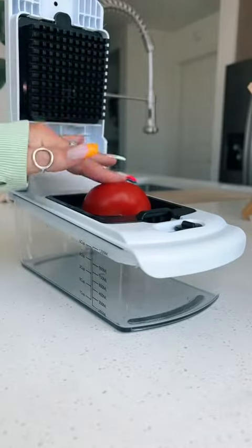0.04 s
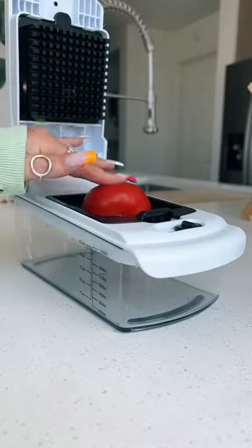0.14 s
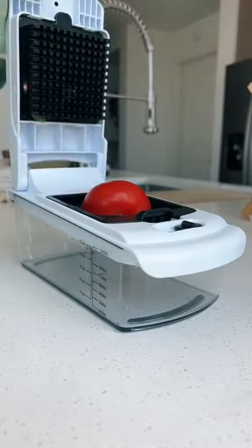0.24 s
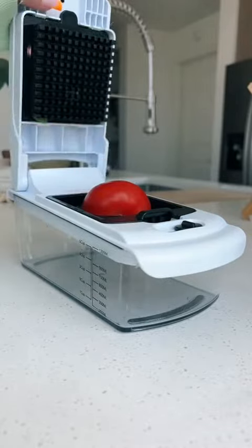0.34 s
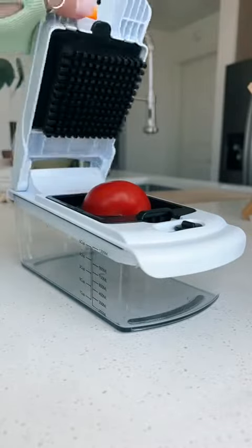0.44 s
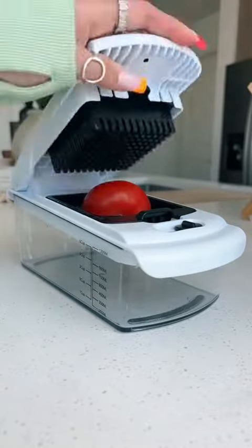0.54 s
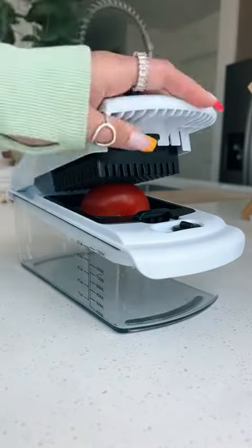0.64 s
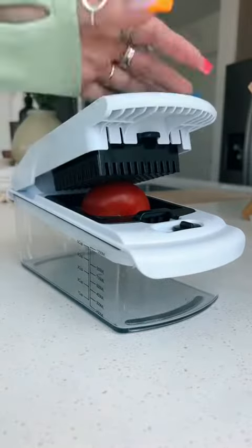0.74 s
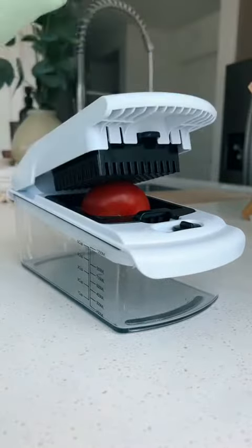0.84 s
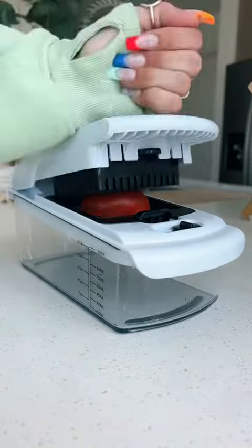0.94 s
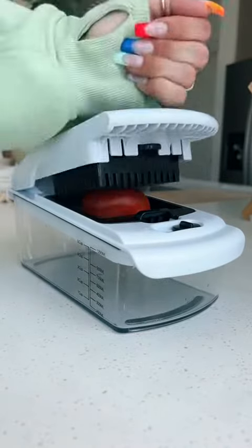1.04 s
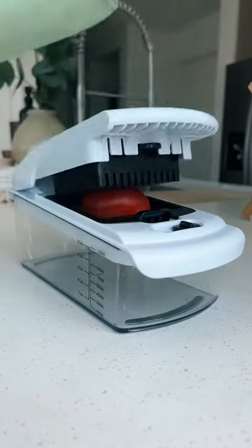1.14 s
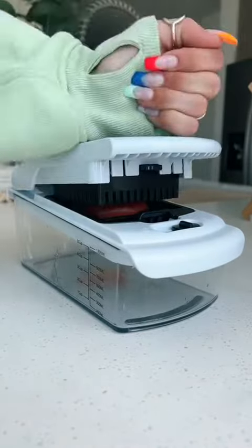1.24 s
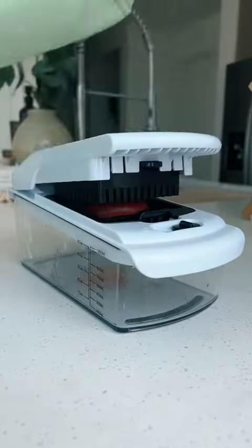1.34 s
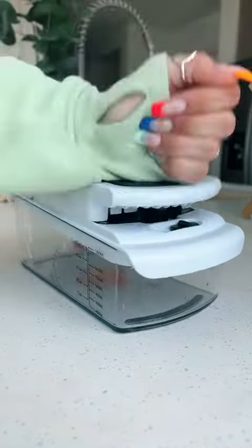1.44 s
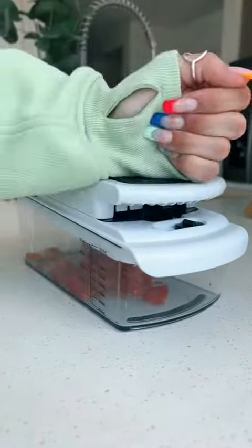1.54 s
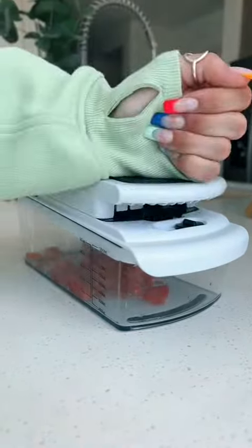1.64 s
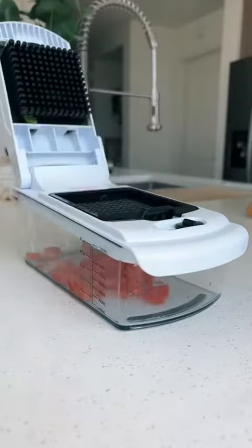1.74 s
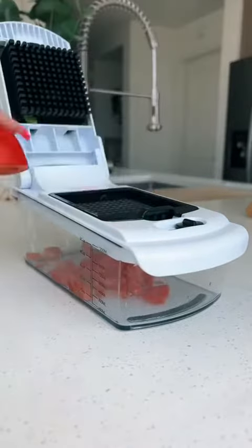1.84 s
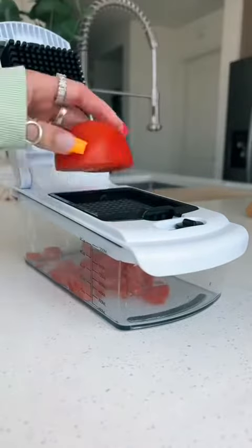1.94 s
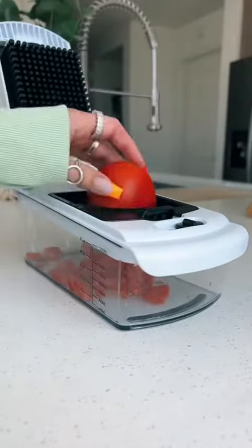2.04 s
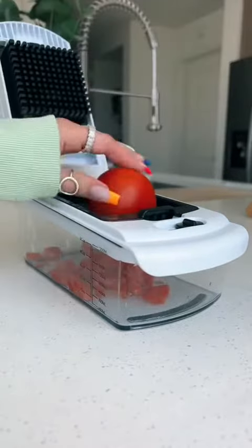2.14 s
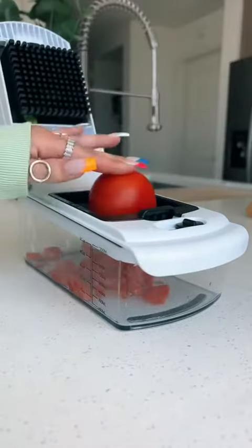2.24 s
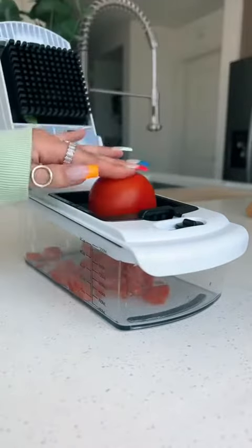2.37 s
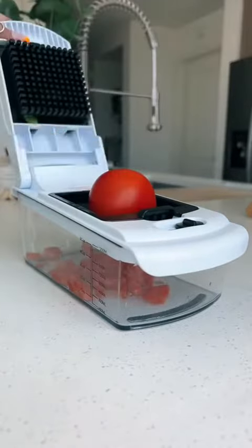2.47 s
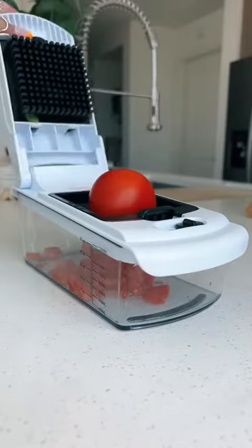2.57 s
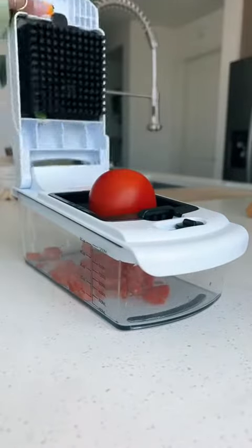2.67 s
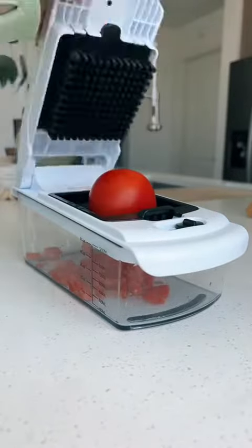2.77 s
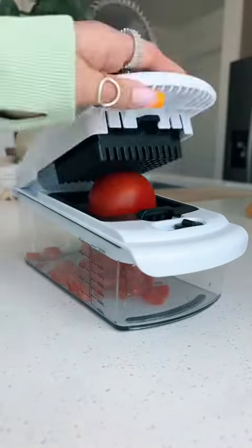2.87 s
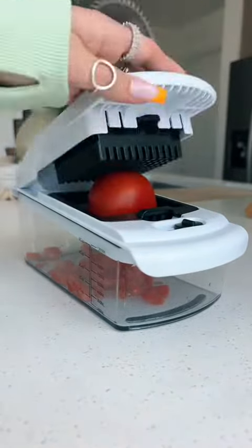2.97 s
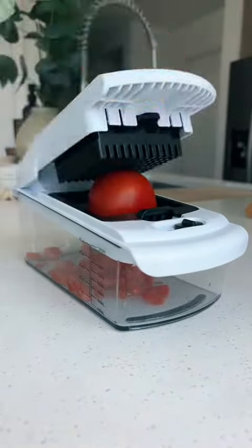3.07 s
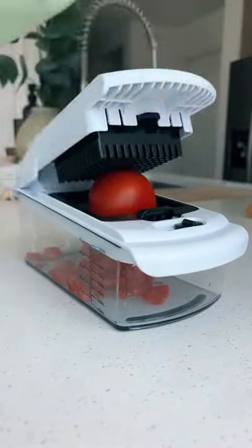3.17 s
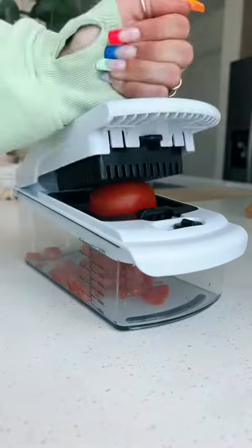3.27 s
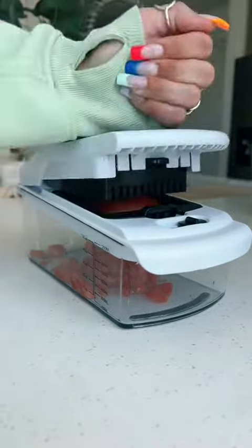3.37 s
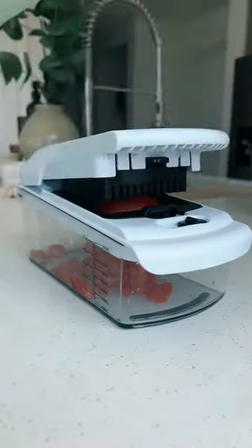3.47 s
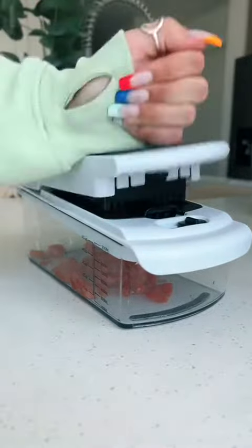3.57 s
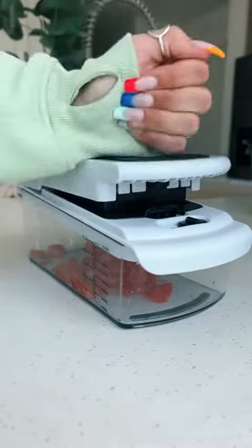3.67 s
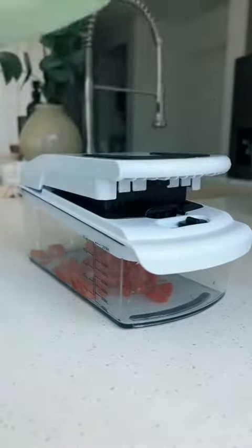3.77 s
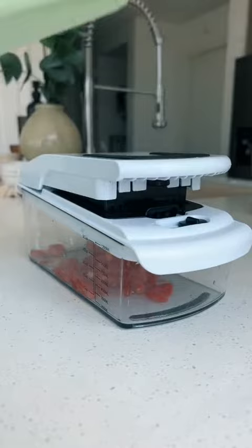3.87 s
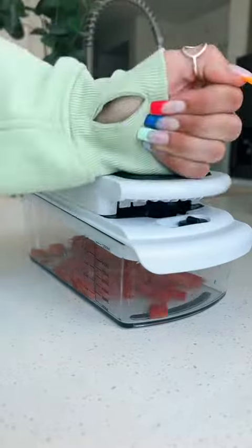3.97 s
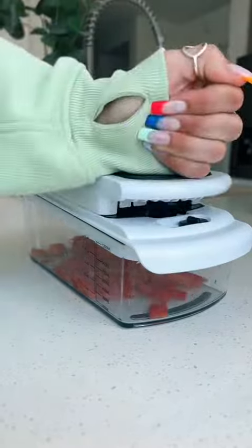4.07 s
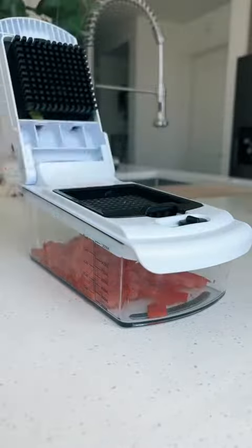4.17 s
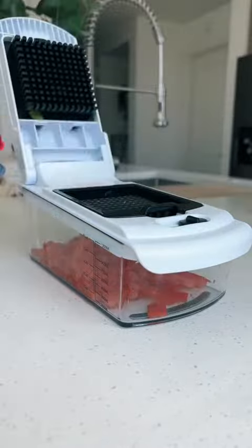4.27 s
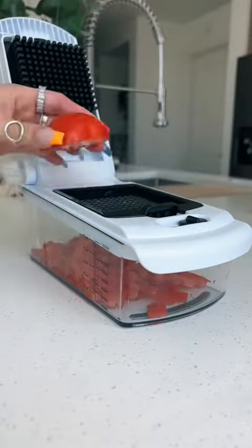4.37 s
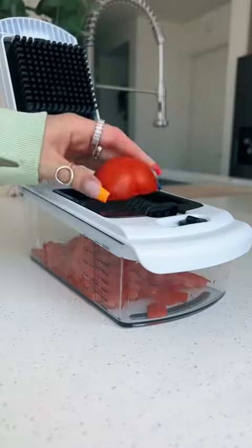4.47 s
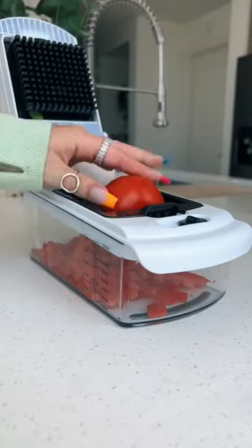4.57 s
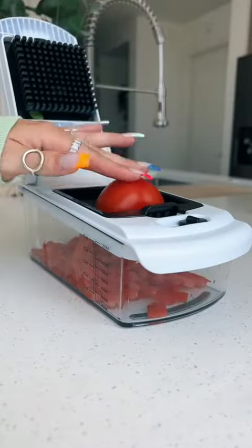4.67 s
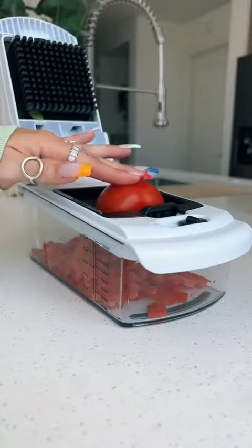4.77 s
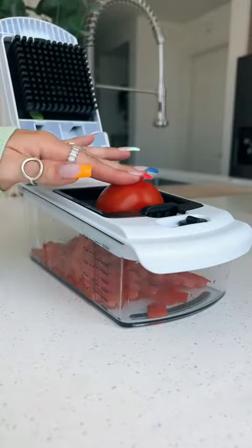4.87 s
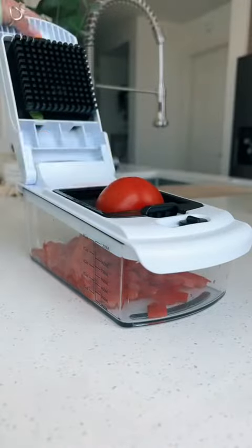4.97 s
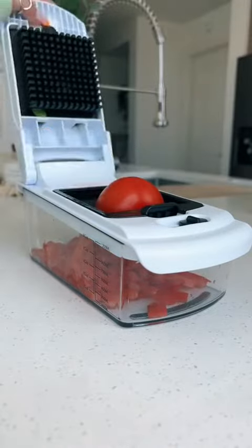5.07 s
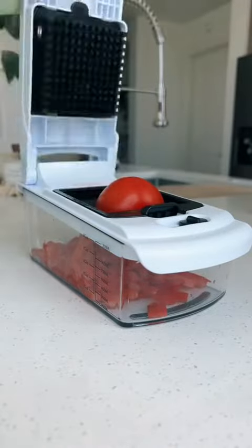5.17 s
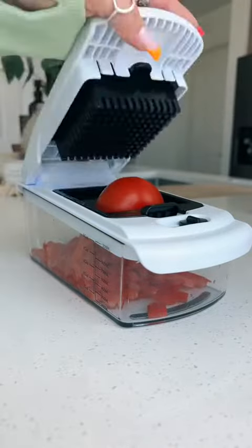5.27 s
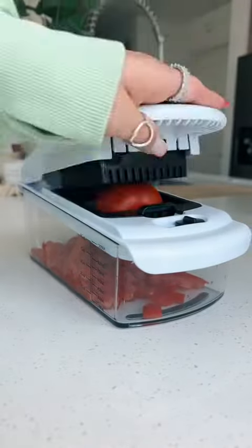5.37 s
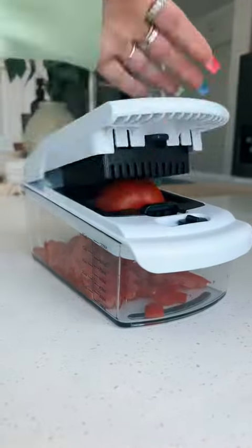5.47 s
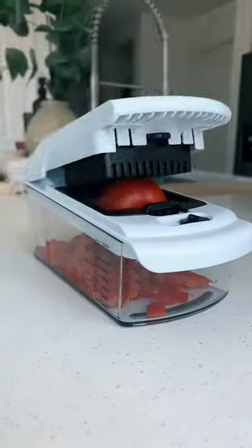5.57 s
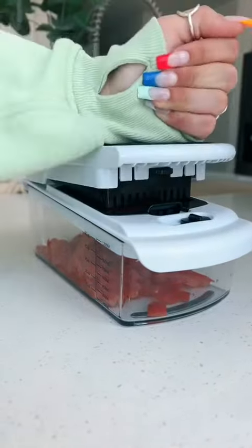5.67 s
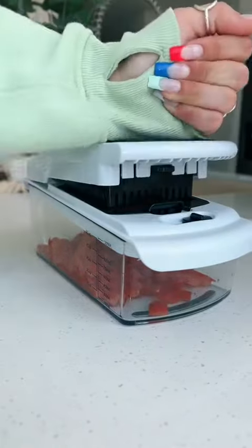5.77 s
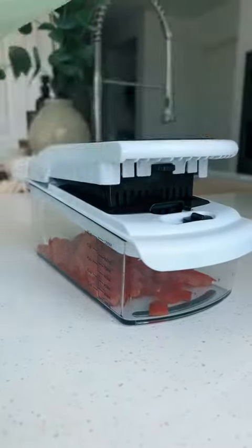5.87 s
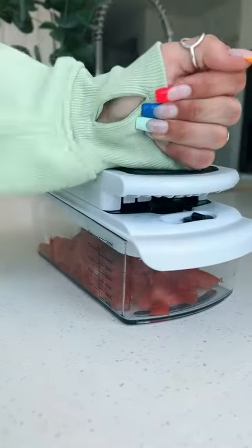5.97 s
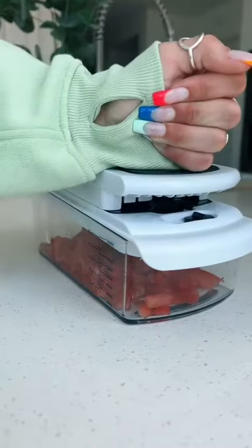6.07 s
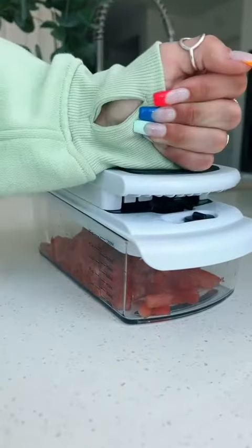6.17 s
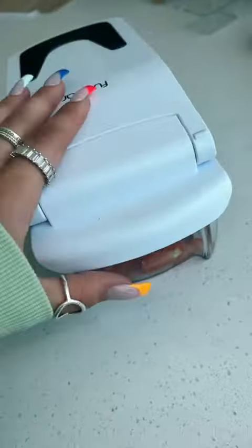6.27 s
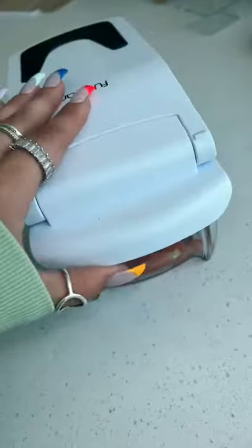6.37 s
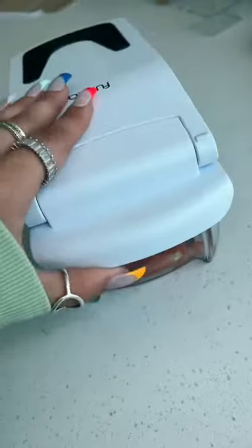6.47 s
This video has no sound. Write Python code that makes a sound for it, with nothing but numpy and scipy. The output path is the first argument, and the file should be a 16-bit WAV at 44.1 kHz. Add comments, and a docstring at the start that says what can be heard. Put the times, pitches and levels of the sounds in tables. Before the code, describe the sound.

Three tomato halves are chopped in a plastic dicer: hollow fist thumps on the lid, each series ending in a bright, hard clack.

```python
"""Dicing tomatoes

Three tomato halves are chopped in a plastic dicer on a stone kitchen counter: its hinged lid is swung down onto
the fruit and thumped with a fist. The first blows are cushioned and sound hollow; the last drives the flesh through
the blades and clacks the lid shut. Noise bursts excite the plastic's resonances, decaying sines ring its modes.
Fingers and hinge tick in between; the soft hum sinks after each chop and creeps back; the level dips now and then."""
import sys
import numpy as np
from scipy import signal
from scipy.fft import rfft, irfft
from scipy.io import wavfile

SR = 44100
rng = np.random.default_rng(int(sys.argv[2]) if len(sys.argv) > 2 else 0)


def materialize(psi):
    """Save the field psi as 16-bit PCM at rate SR to the path in sys.argv[1].

    A 1-D psi becomes a single channel; in a 2-D psi each row is a channel.
    """
    bounded = np.clip(np.atleast_2d(psi).T, -1, 1)
    quanta = np.round(bounded * 32767).astype(np.int16)
    wavfile.write(sys.argv[1], SR, quanta)


N = 287432
SIZE, ONSET = 32768, 2048   # samples computed per contact, and those before its onset
T = (np.arange(SIZE) - ONSET) / SR   # seconds from the onset of a contact
HZ = np.maximum(np.fft.rfftfreq(SIZE, 1 / SR), 1)


def from_db(db):
    """Logarithmic level: decibels to amplitude gain."""
    return 10 ** (np.asarray(db) / 20)


def at_hz(points, hz):
    """Spectral envelope: dB values interpolated along a log-frequency axis."""
    knots, values = np.transpose(points)
    return np.interp(np.log(hz), np.log(knots), values)


def between(t, start, end, fade_in_s, fade_out_s):
    """Linear gating: 1 from start to end, with straight fades just inside; 0 elsewhere."""
    return np.clip(np.minimum((t - start) / fade_in_s, (end - t) / fade_out_s), 0, 1)


def steady_noise(spectrum):
    """Spectral shaping: white noise takes on a given colour; rms 1."""
    hz = np.maximum(np.fft.rfftfreq(N, 1 / SR), 1)
    spectrum_of_noise = rfft(rng.standard_normal(N)) * from_db(at_hz(spectrum, hz))
    x = irfft(spectrum_of_noise, N)
    return x / x.std()


# Colour of the room's low hum. Each row: frequency in Hz, level in dB.
HUM_SPECTRUM = [(15, -39), (25, -6.5), (102, -4.5), (140, 1.5), (227, 2.5), (284, -10), (320, 3.5),
                (350, -13.5), (383, -11), (628, -14.5), (900, -22.5), (1170, -54.5), (1980, -120)]
# Colour of the faint hiss. Each row: frequency in Hz, level in dB.
HISS_SPECTRUM = [(240, -27), (400, -4), (643, -6), (928, -7.5), (1150, -3.5), (1560, -10), (1740, -8),
                 (5070, -20.5), (7440, -20), (10400, -34), (15500, -31)]
# The arm swings the lid down and the background swells. Each row: start in seconds, end in seconds.
LID_SWINGS = [(.27, .86), (2.48, 3.23), (4.95, 5.45)]
HUM_DB, HISS_DB = -58, -70.5
SWELL_HUM_DB, SWELL_HISS_DB, SWELL_FADE_S = 4, 7, .08
SHUT_CUSHIONING = .4   # a blow cushioned less than this shuts the lid
SINK_DB, RECOVERY_DB_PER_S = 10.5, 12.5
HUSH_DB, HUSH_S = 10, 0.327   # further brief drop after the lid shuts


def background(t):
    """Stationary noise under a slow envelope: hum and hiss swell with the swung lid, sink once it shuts."""
    swing = sum(between(t, start, end + SWELL_FADE_S, SWELL_FADE_S, SWELL_FADE_S) for start, end in LID_SWINGS)
    sunk_db = 0
    for s, _, cushioning, *_ in FIST_BLOWS:
        if cushioning < SHUT_CUSHIONING:
            sunk_db += (t > s) * np.maximum(SINK_DB - RECOVERY_DB_PER_S * (t - s), 0)
            sunk_db += HUSH_DB * between(t, s, s + HUSH_S, fade_in_s=.1, fade_out_s=0.033)
    hum = from_db(HUM_DB + SWELL_HUM_DB * swing) * steady_noise(HUM_SPECTRUM)
    hiss = from_db(HISS_DB + SWELL_HISS_DB * swing) * steady_noise(HISS_SPECTRUM)
    return from_db(-sunk_db) * (hum + hiss)


# Brief dips of the whole sound. Each row: start in seconds, end in seconds.
LEVEL_DIPS = [(.2, .306), (1.683, 1.792), (2.448, 2.526), (3.312, 3.4), (4.141, 4.252), (4.889, 4.975),
              (6.272, 6.381)]
DIP_DB = -28.5


def dips(t, fall_s=0.0069, rise_s=0.025):
    """Amplitude modulation: the level drops for a moment and fades back in."""
    return from_db(DIP_DB * sum(between(t, start, end, fall_s, rise_s) for start, end in LEVEL_DIPS))


def until_next_dip(s):
    """Truncated decay: a contact at time s ends in the middle of the next dip and does not come back."""
    middles = [(start + end) / 2 for start, end in LEVEL_DIPS]
    next_middle = min([middle for middle in middles if middle > s] + [N / SR])
    return T < next_middle - s


def dying(t60):
    """Exponential decay: starts at the contact and falls 60 dB in t60 seconds."""
    return (T >= 0) * from_db(-60 * np.maximum(T, 0) / t60)


def grains(spread_db):
    """Granular excitation: noise whose level jumps from one short grain to the next; rms 1."""
    sizes = from_db(spread_db * rng.standard_normal(SIZE // 32))
    x = rng.standard_normal(SIZE) * np.repeat(sizes, SIZE // len(sizes))
    return x / x.std()


def clumps(spread_db):
    """Random modulation: an envelope that gathers grains in bunches a few milliseconds long; rms 1."""
    knots = T[::128]
    gain = from_db(spread_db * np.interp(T, knots, rng.standard_normal(len(knots))))
    return gain / np.sqrt(np.mean(gain ** 2))


def resonance(hz, width_hz, lift_db):
    """Resonance curve: one bell-shaped bump, in dB."""
    return lift_db / (1 + (2 * (HZ - hz) / width_hz) ** 2)


def coloured(x, curve_db):
    """Minimum-phase filtering: causal, so that spectral peaks ring on after the excitation."""
    cepstrum = irfft(np.log(from_db(curve_db)))
    # folding the cepstrum onto positive times gives the minimum phase
    cepstrum[1:SIZE // 2] *= 2
    cepstrum[SIZE // 2 + 1:] = 0
    return irfft(rfft(x) * np.exp(rfft(cepstrum)))


# Decay of the kitchen's reverberation. Each row: frequency in Hz, t60 in seconds.
KITCHEN_DECAY = [(100, .3), (400, 0.26), (1000, 0.33), (2800, 0.33), (7500, 0.25), (12000, 0.24)]


def kitchen_tail():
    """Diffuse reverberation: bands of noise, each dying at its own pace."""
    white = rfft(rng.standard_normal(SIZE))
    knots = np.log(np.array(KITCHEN_DECAY)[:, 0])
    # overlapping triangular bands on the log-frequency axis
    bands = [irfft(white * np.interp(np.log(HZ), knots, share)) for share in np.eye(len(KITCHEN_DECAY))]
    build_up = np.clip(T / 0.0013, 0, 1)
    return build_up * sum(band * dying(t60) for band, (_, t60) in zip(bands, KITCHEN_DECAY))


def rebound(delay_s=.00265, share=0.064, dull_hz=3500):
    """Comb filtering, in dB: the lid bounces once after each contact and the dull repeat ripples the spectrum."""
    repeat = share * np.exp(-2j * np.pi * HZ * delay_s) / (1 + (HZ / dull_hz) ** 2)
    return 20 * np.log10(np.abs(1 + repeat))


# Resonances of the plastic shell. Each row: frequency in Hz, width in Hz, mean lift in dB.
SHELL_RESONANCES = [(388, 35, 4.5), (563, 42, 3.5), (664, 32, 4), (737, 58, 7), (945, 51, -0.5),
                    (1082, 45, 3.5), (1330, 70, 0.5), (1620, 150, 2.5), (2170, 270, 1), (2920, 140, 3),
                    (3300, 160, 4.5), (3620, 90, 5), (4130, 250, 4.5), (5145, 160, 0), (5900, 140, 3.5),
                    (7060, 220, -3)]
# Spectrum of the hard contact. Each row: frequency in Hz, level in dB.
CONTACT_SPECTRUM = [(40, -16.5), (130, -10), (250, -3), (420, -2.5), (800, -8.5), (1300, -6.5),
                    (2500, -11.5), (4500, -19), (7500, -21.5), (10000, -38.5), (15500, -41)]
# Spectrum of the lead-in rasp. Each row: frequency in Hz, level in dB.
RASP_SPECTRUM = [(40, -23), (130, -17.5), (400, -22), (800, -17.5), (1400, -11.5), (2500, -19.5),
                 (4500, -24.5), (7500, -29), (10000, -43.5), (15500, -47)]
# Spectrum of the room tail. Each row: frequency in Hz, level in dB.
TAIL_SPECTRUM = [(40, -35), (130, -21), (350, -16), (1000, -20), (2000, -24), (4000, -28.5), (7800, -31),
                 (10000, -47), (15500, -55.5)]


def clack(level_db, brightness, contact_s, lead_db, lead_s, room_db, strongest_db):
    """Source and filter: a rasp swells into a burst of plastic contacts; shell and kitchen ring after it."""
    # every contact lands elsewhere and weights the shell's resonances anew
    shell_db = sum(resonance(hz, width, lift + rng.standard_normal()) for hz, width, lift in SHELL_RESONANCES)
    tilt_db = brightness * np.log2(np.maximum(HZ, 250) / 1000)   # brightness in dB per octave
    body_db = level_db + shell_db + tilt_db

    burst = grains(spread_db=0.5) * np.exp(np.minimum(T / 0.00018, -T / contact_s))
    # the first hard touch is brief and, being differentiated noise, holds mostly treble
    snap = from_db(4.5) * np.gradient(rng.standard_normal(SIZE) * dying(0.013))

    rise = np.sin(np.pi / 2 * np.clip(1 + T / lead_s, 0, 1)) ** 2.2
    swell = rise * np.exp(-np.maximum(T, 0) / 0.0043)
    rasp = from_db(lead_db) * swell * grains(spread_db=4.0) * clumps(spread_db=1.1)

    near_walls = from_db(0.5) * dying(0.065) * grains(spread_db=0.0) * clumps(spread_db=3.0)
    tail = from_db(room_db) * (kitchen_tail() + near_walls)

    # the strongest resonances stand out far less in the room tail
    direct_db = strongest_db + rebound()
    parts = [
        (burst + snap, CONTACT_SPECTRUM, direct_db),
        (rasp, RASP_SPECTRUM, 1.3 * direct_db),
        (tail, TAIL_SPECTRUM, 0.28 * strongest_db),
    ]
    return sum(coloured(x, at_hz(spectrum, HZ) + body_db + lift_db) for x, spectrum, lift_db in parts)


# Lid, hinge, nails and tomato skin rub briefly. Each row: time of contact in seconds, level in dB, brightness in
# dB per octave, contact decay constant in seconds, lead-in in dB, strongest resonance in Hz.
RUBS = [(.367, -38, 2.5, 0.0047, -3, 2370), (.708, -31, -2.3, 0.017, 6, 1800),
        (.791, -54.5, 6.5, 0.015, -3, 11770), (2.797, -37.5, 2.2, 0.038, 4, 7560),
        (3.087, -45, 3.5, 0.0077, -11, 11000), (3.141, -41, 5, 0.03, -6, 3300),
        (3.388, -39.5, 3, 0.0062, 1, 1530), (4.531, -44.5, 2.5, 0.024, -2.5, 3180),
        (4.991, -23, -1.5, 0.0059, 3, 1804), (5.203, -29.5, -1.5, 0.025, -1.5, 1200),
        (5.81, -37.5, 3.5, 0.022, -8, 2720)]


def scuff(level_db, brightness, contact_s, lead_db, hz):
    """Sliding friction: a contact with a soft start that brings out one broad resonance."""
    strongest_db = resonance(hz, 0.27 * hz, lift_db=6)
    return clack(level_db, brightness, contact_s, lead_db, 0.029, 0, strongest_db)   # lead-in s, room dB


# Fingers and fruit tap the plastic. Each row: time of contact in seconds, level in dB, brightness in dB per octave,
# contact decay constant in seconds, lead-in in dB, strongest resonance in Hz.
FINGER_TAPS = [(.003, -37, -4.5, 0.0064, 0.5, 1080), (.309, -38, -2.5, 0.016, -7, 900),
               (.724, -28, -5.5, 0.0022, -2.5, 1150), (2.27, -37.5, -8.5, 0.0035, 7, 572),
               (2.573, -21.5, -1.3, 0.0029, -8.5, 759), (2.772, -20, -4.5, 0.0016, -13, 788),
               (4.608, -31, -2, .009, -2, 6000), (4.7213, -26.5, -3, 0.0024, -1, 1234),
               (5.0129, -27.5, -0.1, 0.0036, -12, 3150), (5.188, -33, 2, .0027, -6, 1498),
               (5.886, -38, 2, .001, -15, 2800), (6.386, -44, -7, 0.0087, 1.5, 1300)]


def tap(level_db, brightness, contact_s, lead_db, hz):
    """Light impact: a dry touch that brings out one resonance of the shell."""
    strongest_db = resonance(hz, 0.11 * hz, lift_db=10.5)
    return clack(level_db, brightness, contact_s, lead_db, .017, -5, strongest_db)   # lead-in s, room dB


# Modes of the box under a cushioned lid. Each row: ratio to the box tone, relative level in dB, t60 in seconds.
BOX_MODES = [(0.921, -8.5, 0.22), (1.03, -5.5, .12), (1.19, -7.5, .15), (1.5, -15, .13), (1.95, -17, 0.24),
             (2.55, -17.5, 0.29), (2.919, -18, .24)]


def hollow_box(level_db, hz):
    """Modal synthesis: through the soft fruit the blow sets the box's low modes ringing."""
    return sum(from_db(level_db + db) * dying(t60) * np.sin(2 * np.pi * hz * ratio * T)
               for ratio, db, t60 in BOX_MODES)


# The swung lid lands on the fruit and clacks again. Each row: time of contact in seconds, level in dB, brightness in
# dB per octave, contact decay constant in seconds, lead-in in dB, lead-in in seconds, room in dB,
# strongest resonance in Hz.
LID_LANDINGS = [ (.607, -19.5, -2, 0.022, -3, 0.021, -3, 1770),
                (.640, -13.5, -1.5, 0.0031, -2, .004, -6.5, 1706),
                (2.876, -3, 0, 0.0053, -5.5, 0.024, -6, 1702),
                (2.9076, -9, -1, 0.0029, 7, .0098, -3.5, 619), (5.341, -5, 0, .0045, 4.5, .035, 5.5, 1296),
                (5.4844, -5, -0.97, .0034, -10.5, .028, -7, 431), ]


def landing(level_db, brightness, contact_s, lead_db, lead_s, room_db, hz, box_db=-25, box_hz=385):
    """Impact under gravity: the lid drops with a clack and a little of the hollow box."""
    strongest_db = resonance(hz, 0.25 * hz, lift_db=7.5)
    contact = clack(level_db, brightness, contact_s, lead_db, lead_s, room_db, strongest_db)
    return contact + hollow_box(level_db + box_db, box_hz)


def counter_thud(level_db, low_hz=80, high_hz=130):
    """Mass on springs: the whole dicer bounces on its rubber feet, as two decaying low tones."""
    low = 0.11 * dying(0.22) * np.sin(2 * np.pi * low_hz * T)
    high = dying(0.046) * np.sin(2 * np.pi * high_hz * T)
    return from_db(level_db) * (low + high)


def knock(level_db, hz, peak_s=0.0021, width_s=0.002):
    """Damped flexure: the lid bends under the fist and swings back, a dull pulse of a cycle or two."""
    return from_db(level_db) * np.exp(-((T - peak_s) / width_s) ** 2) * np.sin(2 * np.pi * hz * T)


# Modes that ring on after a blow. Each row: frequency in Hz, mean relative level in dB, t60 in seconds.
CONTAINER_MODES = [(749, -42.5, 0.28), (867, -43, 0.23), (1009, -43, 0.33), (1330, -42.5, .25),
                   (1470, -47, .42), (1624, -45, 0.21)]


def container_ring(level_db):
    """Modal synthesis: the clear container rings on, each blow weighting its modes anew."""
    return sum(from_db(level_db + db + 2 * rng.standard_normal()) * dying(t60) * np.sin(2 * np.pi * hz * T)
               for hz, db, t60 in CONTAINER_MODES)


# Fist blows on the lid. Each row: time of contact in seconds, level in dB, cushioning by the fruit from 0 to 1,
# contact decay constant in seconds, lower strongest resonance in Hz, upper strongest resonance in Hz, their lift
# in dB, hollow box tone in dB, its frequency in Hz, counter thud in dB.
FIST_BLOWS = [ (0.9467, 2.5, .98, 0.0042, 961, 1752, 2.9, -15.5, 378, -46.5),
              (1.208, 0.37, .85, 0.0041, 1016, 1317, 3.9, -21.5, 345.6, -37),
              (1.468, -1.5, .12, .0033, 1095, 1689, 3.5, -35.5, 305.4, -20),
              (3.2383, 0.63, .5, .0105, 830, 2039, 3.6, -18, 397.3, -41),
              (3.599, 2.5, .88, 0.0029, 572.6, 1126, 7.5, -18, 382.3, -39.5),
              (3.9276, -1.2, .02, .0022, 1110, 1456, 4, -38, 357, -37),
              (5.6814, 1.5, 0.68, 0.0053, 683, 1166, 9.4, -27.5, 415, -22),
              (5.9574, -.5, .08, 0.0024, 693, 1277, 9, -38.5, 380, -42), ]
# what cushioning does to a blow: (bare plastic, on whole fruit)
BRIGHTNESS_DB_PER_OCTAVE, LEAD_IN_DB, ROOM_DB = (2, -1), (0.5, -4.5), (2, -1.38)
KNOCK_LEVEL_DB, KNOCK_HZ = (-15, -22), (250, 483)
LEAD_IN_S = .031   # the rasp before a blow's hard contact


def blow(level_db, cushioning, contact_s, low_hz, high_hz, lift_db, box_db, box_hz, thud_db):
    """Cushioned impact: dull on the fruit; bright, with a deeper, harder knock, once the lid meets the frame."""
    brightness, lead_db, room_db, knock_db, knock_hz = (
        np.interp(cushioning, [0, 1], ends)
        for ends in (BRIGHTNESS_DB_PER_OCTAVE, LEAD_IN_DB, ROOM_DB, KNOCK_LEVEL_DB, KNOCK_HZ))
    strongest_db = sum(resonance(hz, 0.1 * hz, lift_db) for hz in (low_hz, high_hz))
    contact = clack(level_db, brightness, contact_s, lead_db, LEAD_IN_S, room_db, strongest_db)
    lid = knock(level_db + knock_db, knock_hz)
    ringing = hollow_box(box_db, box_hz) + container_ring(level_db + room_db)
    return contact + lid + ringing + counter_thud(thud_db)


def without_deep_bass(x, corner_hz=62):
    """Radiation efficiency: a small light box radiates little below its bounce, hence a high-pass."""
    return signal.sosfilt(signal.butter(3, corner_hz, "high", fs=SR, output="sos"), x)


def add(track, s, sound):
    """Superposition: mix one contact into the track at time s."""
    at = round(s * SR) - ONSET + np.arange(SIZE)
    inside = (at >= 0) & (at < N)
    track[at[inside]] += sound[inside]


def scene():
    """Superposition: scuffs, taps, lid landings and blows on the dicer over the room's background."""
    t = np.arange(N) / SR
    dicer = np.zeros(N)
    sources = ((scuff, RUBS), (tap, FINGER_TAPS), (landing, LID_LANDINGS), (blow, FIST_BLOWS))
    for sound, events in sources:
        for s, *event in events:
            add(dicer, s, sound(*event) * until_next_dip(s))
    mix = without_deep_bass(dicer) + background(t)
    return (mix * dips(t))[None]


def record(dry):
    """Band limiting: a steep elliptic low-pass cuts the top."""
    low_pass = signal.ellip(12, .1, 80, 15900, fs=SR, output="sos")   # ripple dB, rejection dB, cutoff Hz
    return signal.sosfilt(low_pass, dry)


dry = scene()
out = record(dry)
materialize(out)
```